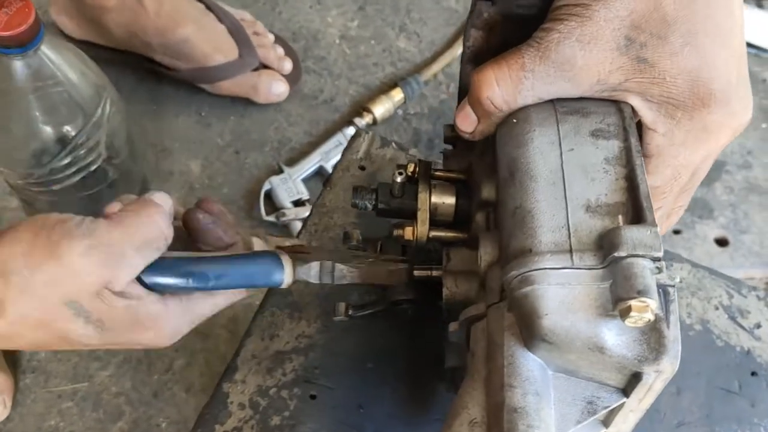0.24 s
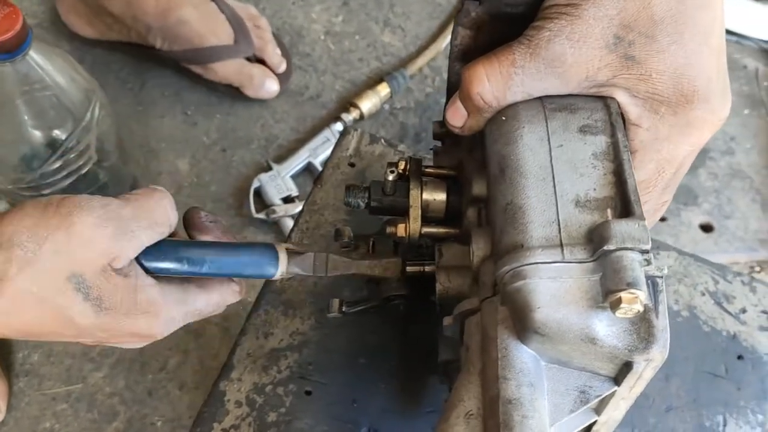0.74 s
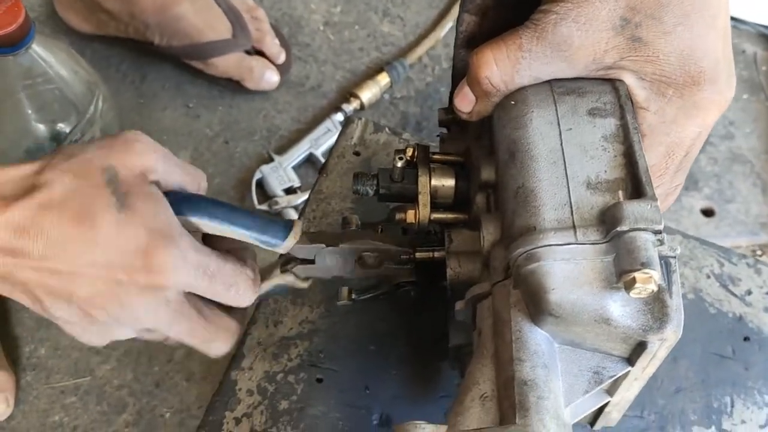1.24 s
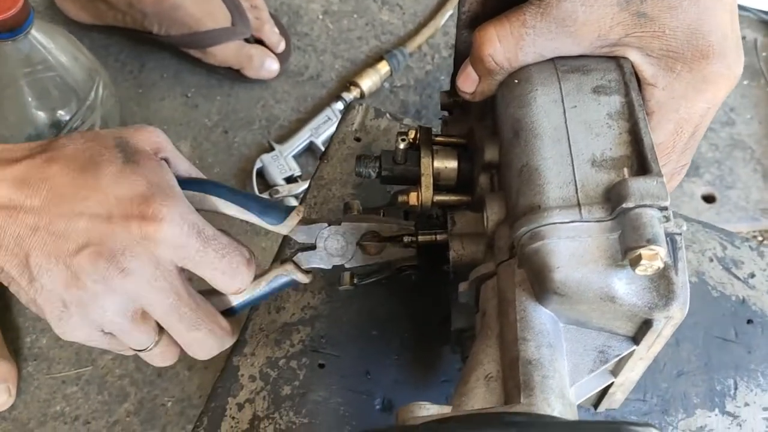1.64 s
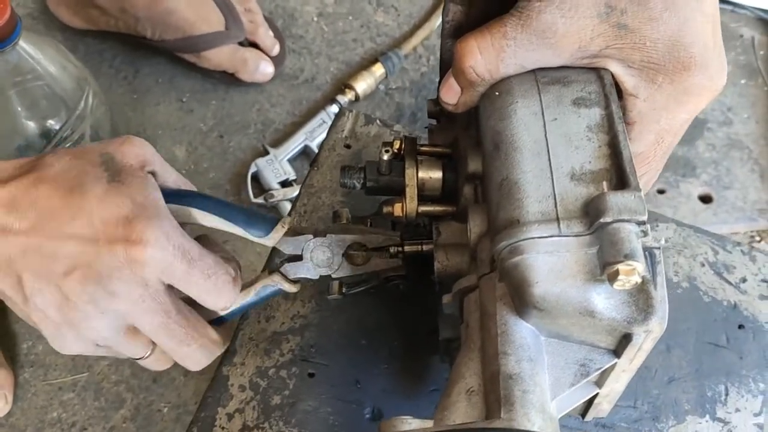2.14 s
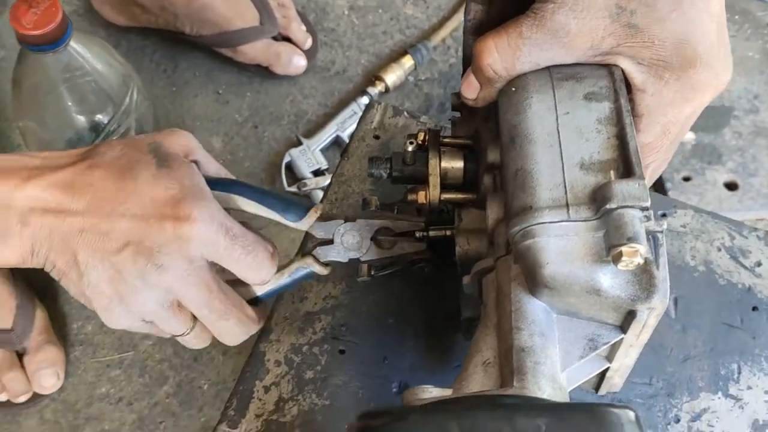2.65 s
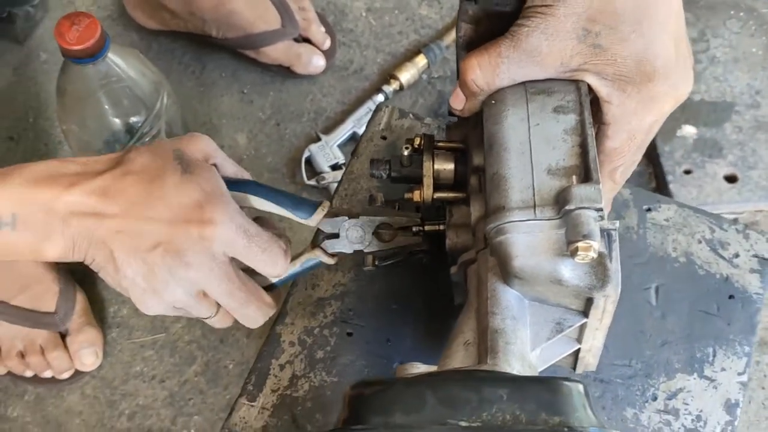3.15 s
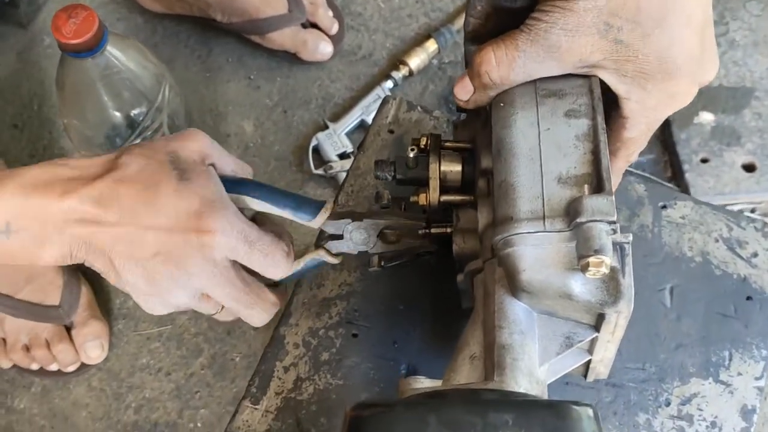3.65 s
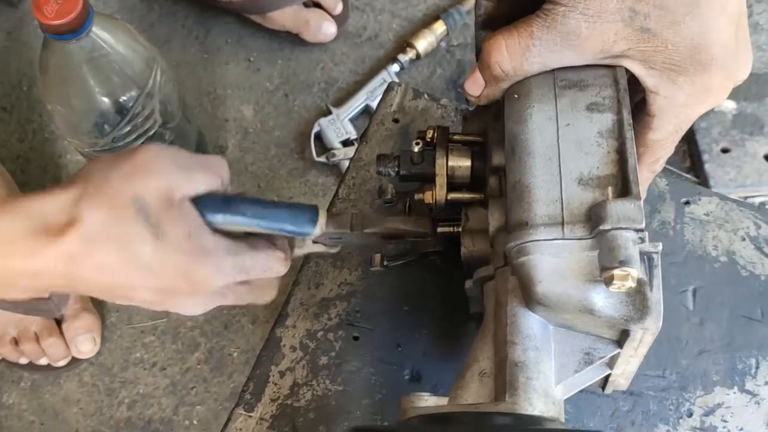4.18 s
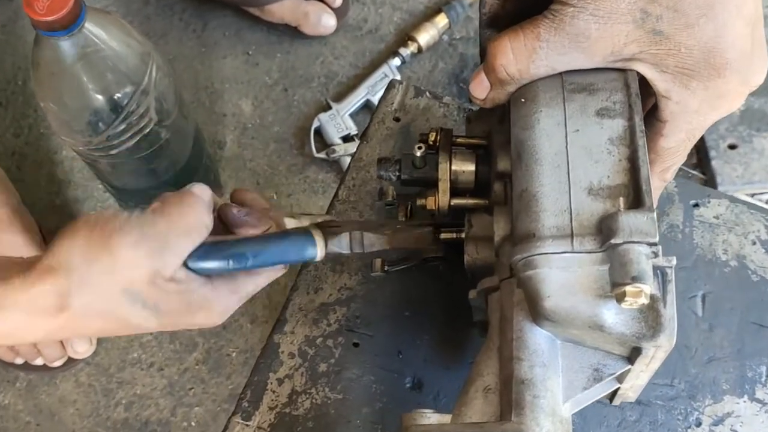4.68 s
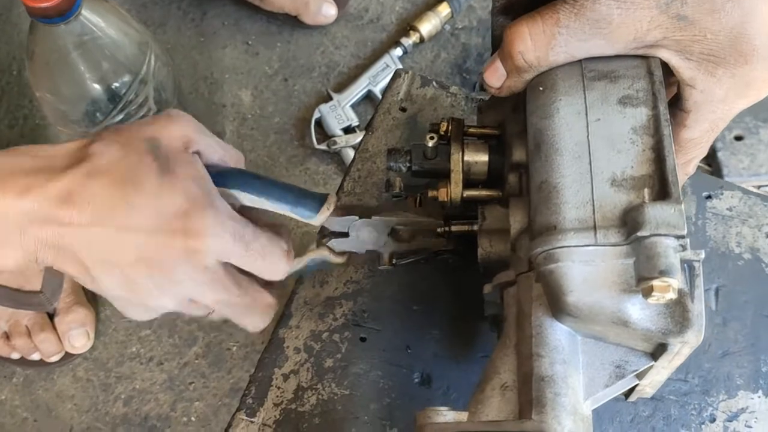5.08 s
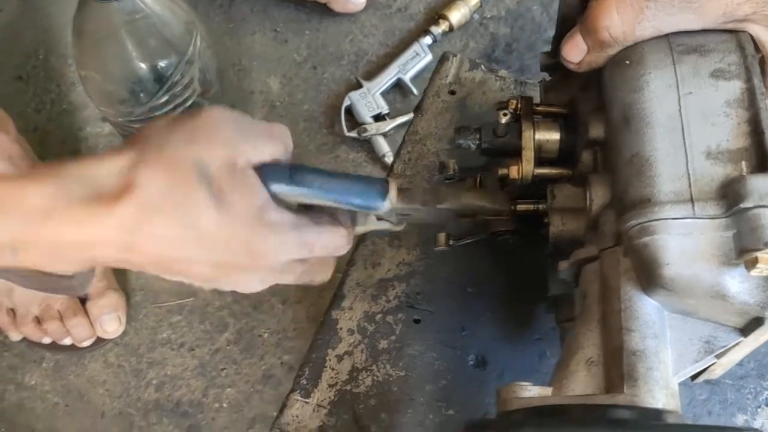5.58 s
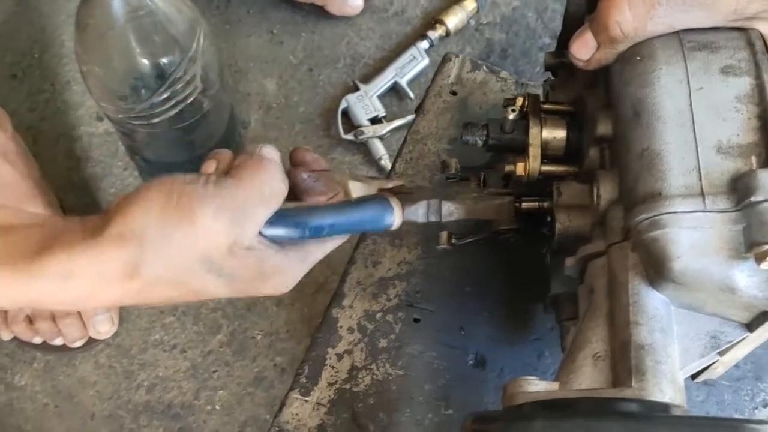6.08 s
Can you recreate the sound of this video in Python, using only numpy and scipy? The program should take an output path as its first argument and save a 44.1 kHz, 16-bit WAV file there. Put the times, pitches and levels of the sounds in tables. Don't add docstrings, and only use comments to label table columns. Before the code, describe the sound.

A steel valve is ground to and fro in abrasive paste, scraping and clicking about four times a second, distant engines droning behind.

```python
import sys
import numpy as np
from scipy import signal
from scipy.fft import rfft, irfft, next_fast_len
from scipy.io import wavfile
from scipy.ndimage import uniform_filter1d

SR = 44100
rng = np.random.default_rng(int(sys.argv[2]) if len(sys.argv) > 2 else 0)


def undo_db(level):
    steps = np.asarray(level, float) / 20
    return 10 ** steps


def dump(signal):
    limited = np.clip(np.atleast_2d(signal).T, -1, 1)
    pcm = np.round(limited * 32767).astype(np.int16)
    wavfile.write(sys.argv[1], SR, pcm)


N = 278756


def evened(x):
    return x / np.sqrt(np.mean(x ** 2) + 1e-20)


def read(points, hz):
    f, value = np.transpose(points)
    return np.interp(np.log(hz + 1), np.log(f + 1), value)


def colour(x, gain_db):
    log_gain = np.maximum(gain_db(abs(np.fft.fftfreq(8192, 1 / SR))), -100) * np.log(10) / 20
    taps = np.fft.ifft(np.exp(np.conj(signal.hilbert(log_gain)))).real[:4096]
    return signal.oaconvolve(x, taps)[:len(x)]


def ring(x, modes, wander=None):
    out = np.zeros(len(x))
    for k, (hz, width_hz, db) in enumerate(modes):
        drive = x if wander is None else x * np.roll(wander, k * N // len(modes))
        mode = signal.lfilter(*signal.iirpeak(hz, hz / width_hz, SR), drive)
        out += (-1) ** k * undo_db(db) * mode
    return out


def resonate(x, hz, width_hz):
    turn = np.exp(2j * np.pi * np.cumsum(hz) / SR)
    r = np.exp(-np.pi * width_hz / SR)
    return 2 * (turn * signal.lfilter([1 - r], [1, -r], x / turn)).real


def drift(rate_hz):
    return evened(signal.lfilter(*signal.butter(2, rate_hz, fs=SR), rng.standard_normal(N)))


def swells(rows, rest_db):
    t = np.arange(N) / SR
    bells = sum(undo_db(2 * db) * np.exp(-((t - s) / width_s) ** 2) for s, width_s, db in rows)
    return np.sqrt(undo_db(2 * rest_db) + bells)


def pair(x, other, same):
    size = next_fast_len(N)
    c = np.clip(read(same, np.fft.rfftfreq(size, 1 / SR)), -1, 1)
    mixed = c * rfft(x, size) + np.sqrt(1 - c ** 2) * rfft(other, size)
    return np.array([irfft(mixed, size)[:N], x])


def reflections(t60_s):
    t = np.arange(round(t60_s * SR)) / SR
    taps = rng.standard_normal(len(t)) * undo_db(-60 * t / t60_s)
    return taps / np.linalg.norm(taps)


# (time [s], speed [Hz])
IDLE_SPEED = [(1.5, 40.6), (1.8, 44.15), (2.1, 45.2), (2.55, 39.03), (3.3, 45.5), (3.8, 47), (4.8, 45.76),
              (6.32, 49.17)]
# (multiple of shaft speed, level [dB])
IDLE_ORDERS = [(2, -5.5), (3, -8), (4, -9)]
# (time [s], width [s], level [dB])
DRONE_SWELLS = [
    (0, 0.48, -52.5),
    (1.3, 0.81, -51),
    (3.5, 0.15, -42.5),
    (4.2, 0.19, -49),
    (5.57, 0.27, -40.5),
]
# (time [s], width [s], level [dB])
THROB_SWELLS = [
    (.7, .8, -51),
    (5.8, .25, -52),
]


def engines():
    t = np.arange(N) / SR
    full_hz, db_per_hz = 46.1, 0.5
    shaft_hz = np.interp(t, *np.transpose(IDLE_SPEED))
    turns = np.cumsum(shaft_hz * (1 + 0.0023 * drift(3.4))) / SR
    idle = sum(undo_db(db + 1.9 * drift(5.9)) * np.sin(2 * np.pi * k * turns) for k, db in IDLE_ORDERS)
    idle *= (t > IDLE_SPEED[0][0]) * undo_db(-47 + db_per_hz * np.minimum(shaft_hz - full_hz, 0))

    drone_hz = 104.3 * (1 + 0.011 * drift(3.9))
    angle = 2 * np.pi * np.cumsum(drone_hz) / SR
    drone = swells(DRONE_SWELLS, -59) * np.sin(angle)
    drone += swells(THROB_SWELLS, -60) * np.sin(angle / 2)
    return np.sqrt(2) * (idle + drone * undo_db(2.0 * drift(7.2)))


# (frequency [Hz], density [dB per Hz])
RUMBLE_SPECTRUM = [(12, -34), (20, -23), (43, -1), (103, -2), (290, -8.5), (454, -15), (541, -12),
                   (792, -17), (900, -17), (1170, -30), (1980, -120)]
# (frequency [Hz], density [dB per Hz])
HISS_SPECTRUM = [(240, -32), (400, -1.5), (545, -26), (598, 0), (710, -19), (816, -17.5), (1080, -5.5),
                 (1850, -10.5), (3500, -5), (5570, -12), (6110, -19.5), (6600, -14.5), (9880, -30),
                 (16200, -32)]
# (time [s], width [s], level [dB])
PASSES = [
    (.7, 0.8, -46),
    (5.65, 0.48, -44.5),
]
# (frequency [Hz], likeness [-1..1])
SAME_FAR = [(60, 0.97), (180, 0.95), (550, 0.74), (1650, -0.47), (4970, 0.27), (15000, -0.3)]


def shop():
    sides = []
    for a, b in rng.standard_normal((2, 2, N)):
        rumble = evened(colour(a, lambda hz: read(RUMBLE_SPECTRUM, hz))) * swells(PASSES, -45.5)
        hiss = evened(colour(b, lambda hz: read(HISS_SPECTRUM, hz))) * undo_db(-47)
        hiss *= undo_db(0.9 * drift(15))
        sides.append(rumble + hiss)
    return pair(*sides, SAME_FAR) + engines()


# (time [s], width [s], level [dB])
RETURNS = [
    (4.03, 0.033, -57),
    (4.46, 0.04, -61),
    (4.93, 0.046, -51.5),
    (5.41, 0.028, -52),
    (5.91, 0.057, -55),
]
# (centre [Hz], width [Hz], level [dB])
RETURN_RINGS = [(9500, 680, 1), (12800, 1900, -7), (15200, 1500, -10)]


def drag_back():
    hiss = np.array([ring(x, RETURN_RINGS) for x in rng.standard_normal((2, N))])
    return swells(RETURNS, -61) * evened(hiss)


# (frequency [Hz], density [dB per Hz])
STEEL_SPECTRUM = [(680, -24), (1150, -4.5), (1500, -8), (1890, -2.5), (2700, -6.5), (2950, -4.5),
                  (3370, -7), (4490, -0.5), (4910, -1), (6330, -10), (7230, -17.5), (9220, -15.5),
                  (11500, -19.5), (12900, -18.5), (16200, -35)]
# (centre [Hz], width [Hz], level [dB])
STEEL_RINGS = [(3003, 42, 1.5), (4660, 27, -26), (5106, 90, -2.5), (5940, 43, 5), (2228, 50, -6),
               (1905, 170, -16), (6300, 53, 3.5)]


def steel(x):
    return colour(x + ring(x, STEEL_RINGS), lambda hz: read(STEEL_SPECTRUM, hz))


# (centre [Hz], width [Hz], level [dB])
HOUSING_MODES = [(236, 46.5, -1.5), (296.3, 4.4, 4.5), (355, 37, -3.5), (394, 14, -5), (502, 85, 3.5),
                 (607, 71, 1), (612, 34, -4), (714, 58, -0.5), (901, 210, -1), (1104, 38, -2),
                 (1262, 71, -5.5), (1370, 96, -3)]


def housing(x, wander=None):
    return ring(x, HOUSING_MODES, wander)


# (time [s], width [s], level [dB])
CHATTER = [(.24, 0.018, -34), (.285, 0.027, -30), (.465, 0.022, -41), (.785, 0.023, -35),
           (1.39, 0.02, -30.5), (1.6, 0.01, -34), (1.66, 0.032, -31.5), (1.845, .02, -33),
           (1.895, .01, -34), (2.115, 0.0089, -40), (2.295, 0.013, -26), (2.475, 0.0087, -39),
           (2.855, 0.023, -30.5), (3.045, 0.014, -31), (3.11, 0.011, -28.5), (3.15, 0.0051, -32),
           (3.19, .01, -52), (3.285, .02, -28.5), (3.48, 0.02, -53), (3.81, 0.029, -33),
           (4.265, 0.013, -25), (4.35, 0.0054, -30.5), (4.73, 0.037, -35), (5.2, .015, -28),
           (5.36, .01, -43), (5.7, 0.038, -38), (5.82, 0.02, -46.5), (6.11, 0.016, -29),
           (6.295, 0.023, -37.5)]


def chatter():
    hz, width_hz = 537 + 26.7 * drift(6.8), 59
    once = resonate(rng.standard_normal(N), hz, width_hz)
    return swells(CHATTER, -90) * evened(resonate(once, hz, 2 * width_hz))


# (time [s], peak level [dB], relative housing knock [dB])
JAWS = [(0.0608, -23, -3), (0.16, -24, -9), (0.395, -34, -14.5), (0.419, -29, -6), (0.6045, -24, -12),
        (0.665, -21, -16), (0.922, -31, -8), (0.972, -15.5, -2), (1.1454, -29, -2.5), (1.276, -26, -12),
        (1.302, -19, -10), (1.5085, -22, -5), (1.7855, -27, -4.5), (1.997, -33, -1), (2.2303, -39, -4),
        (2.4637, -29, 11), (2.7573, -18.5, -20), (3.0045, -17, -11), (3.255, -34, -16), (3.2635, -16, -8),
        (3.4535, -21.5, -12), (3.744, -16, 2), (4.194, -10.5, -0.5), (4.657, -19, 3), (4.819, -26, -10),
        (5.1098, -12.5, -5.5), (5.334, -25.5, -9), (5.5797, -18, -12), (5.8102, -35, -11.5),
        (6.046, -20, 0)]
# (time [s], peak level [dB], relative housing knock [dB])
CRACKS = [(0.0388, -28, -14), (1.8144, -10, -10), (2.0183, -25, -15), (2.807, -14.5, 1), (3.8721, -14, -12),
          (4.2536, -11, -5), (4.3146, -4.5, -27), (4.338, -15.5, -13), (5.6057, -26, -15),
          (5.681, -13, -15), (6.0866, -16, -19), (6.2714, -18.5, -2)]


def clicks():
    t60_s, attack_s = 0.018, 0.00023
    sharp, knock = np.zeros((2, N + 4000))
    t = np.arange(4000) / SR
    events = JAWS + CRACKS
    for (s, db, knock_db), rattle in zip(events, rng.standard_normal((len(events), 4000))):
        burst = rattle * undo_db(db - 60 * t / t60_s) * np.minimum(t / attack_s, 1)
        burst /= np.sqrt(np.mean(rattle[5:70] ** 2))
        at = round(s * SR)
        sharp[at:at + 4000] += burst
        knock[at:at + 4000] += burst * undo_db(knock_db)
    sharp += undo_db(6) * resonate(sharp, np.full(len(sharp), 4900.), 870)
    edge = signal.butter(2, 7500, "high", fs=SR, output="sos")
    sharp += signal.sosfilt(edge, sharp)
    unit = rng.standard_normal(20000)
    bright = undo_db(-11) * steel(sharp) / np.std(steel(unit))
    low = undo_db(-10.5) * housing(knock) / np.std(housing(unit))
    return (bright + low)[:N]


# (start [s], climb [s], hold [s], grit level [dB], housing rumble relative to grit [dB])
BITTEN = [(.161, 0.12, 0.03, -25.5, -4.5), (.604, 0.001, 0.0023, -39.5, -5.5), (.666, 0.018, 0.02, -32, -5),
          (.75, 0.034, 0.026, -33.5, -1.5), (1.3, 0.088, 0.052, -26, -2.5), (1.51, .12, .015, -25.5, -2),
          (1.65, 0.0028, 0.044, -34, -7), (2.09, .002, 0.04, -35.5, -3.5), (2.758, .002, 0.07, -38.5, -6.5),
          (2.805, 0.048, 0.06, -26, -3), (3.263, 0.022, 0.069, -27, -2.5), (3.454, .002, 0.014, -43.5, 5.5),
          (3.745, .01, .12, -28, -4), (4.194, 0.049, 0.077, -26.5, -5), (4.658, 0.055, 0.067, -24.5, -5),
          (5.109, .002, 0.048, -36, -5.5), (5.157, 0.069, 0.03, -23.5, -3.5), (5.58, 0.1, 0.05, -24.5, -3),
          (6.049, .055, 0.055, -24.5, -2.5)]
# (start [s], climb [s], hold [s], grit level [dB], housing rumble relative to grit [dB])
EASED = [(0.0, 0.012, 0.12, -50.5, -6.5), (.4, 0.051, .06, -28.5, -2.5), (1.24, 0.021, 0.051, -49, -8.5),
         (1.785, 0.04, .092, -26.5, -2), (1.99, 0.034, 0.059, -28, -1), (2.23, 0.062, 0.088, -26.5, -3),
         (2.42, .03, 0.023, -47, 2.5), (2.96, 0.042, 0.023, -36, 1), (3.045, 0.039, 0.051, -34.5, -2),
         (5.29, 0.047, 0.099, -49, -2.5), (5.76, 0.036, 0.068, -45, -9), (6.24, 0.033, 0.069, -31.5, -2)]


def strokes():
    climb_db_per_s, ease_db, bite_s = 102, 17.5, 0.0017
    release_db_per_s, brake_db_per_s2 = 200, 4499.5
    seat_db, seat_s = -3, 0.013
    t = np.arange(N) / SR
    grit_power, housing_power = np.zeros((2, N))
    for rows, eased in ((BITTEN, False), (EASED, True)):
        for start, climb, hold, db, housing_db in rows:
            climb = max(climb, 0.001)
            u = np.maximum(t - start, 0)
            past = np.maximum(u - climb - hold, 0)
            depth_db = ease_db if eased else climb_db_per_s * climb
            shape_db = -depth_db * np.maximum(1 - u / climb, 0)
            shape_db -= (release_db_per_s + brake_db_per_s2 * past) * past
            power = np.minimum(u / bite_s, 1) ** 2 * undo_db(2 * np.maximum(db + shape_db, -200))
            grit_power += power
            housing_power += power * undo_db(2 * (housing_db + seat_db * np.exp(-u / seat_s)))
    return np.sqrt(grit_power), np.sqrt(housing_power)


def grit():
    grains_per_s, spread_db, clump_db = 7000, 2.6, 1.5
    t = np.arange(N) / SR
    grit_gain, housing_gain = strokes()
    crest_hz = 5330 - 117 * t + 130 * drift(2.5)
    size_db = spread_db * np.minimum(rng.exponential(1, N), 4.2) + clump_db * drift(166)
    size = (rng.random(N) < grains_per_s / SR) * undo_db(size_db)
    top = signal.butter(4, 7000, "high", fs=SR, output="sos")
    fizz_gain = undo_db(-1 + 0.2 * t)
    wander = undo_db(2.5 * drift(12))
    out = []
    for ticks in evened(size * rng.choice([-1., 1.], (2, N))):
        bright = evened(steel(ticks + undo_db(-8.5) * resonate(ticks, crest_hz, 530)))
        bright += signal.sosfilt(top, bright) * (fizz_gain - 1)
        low = housing(housing_gain * ticks, wander) / np.std(housing(ticks))
        out.append(grit_gain * bright + low)
    return np.array(out)


# (frequency [Hz], likeness [0..1])
SAME_NEAR = [(60, .99), (500, .97), (900, .85), (1500, .35), (2500, .12), (15000, .05)]
# (frequency [Hz], likeness [0..1])
SAME_TAIL = [(100, 1), (800, 0.95), (1600, 0.57), (15000, 0.47)]


def scene():
    facing, turned = grit()
    valve = facing + clicks() + chatter()
    scattered = signal.oaconvolve(valve, reflections(0.01))[:N]
    near = pair(valve, undo_db(-7) * scattered + undo_db(-1) * turned, SAME_NEAR)
    tail = [signal.oaconvolve(valve, reflections(0.086))[:N] for _ in near]
    return near + undo_db(-7) * pair(*tail, SAME_TAIL) + drag_back() + shop()


# (frequency [Hz], share [0..1])
DROPPED = [(3000, 0), (4600, .05), (5800, .15), (6600, .2), (7400, .34), (8200, .4), (9600, .22),
           (12000, .3), (14000, .34), (15200, .15)]


def patchy_treble(x):
    patchy_db, edge_hz, attack_edge_hz, bins = 4.5, 15850, 16100, 10
    frame = dict(window=np.sqrt(signal.get_window("hann", 2048)), nperseg=2048, noverlap=1024)
    hz, _, z = signal.stft(x, SR, **frame)
    chance, level = rng.standard_normal((2, z.shape[2], len(hz) // bins + 1))
    chance = evened(uniform_filter1d(chance, size=4, axis=0))
    rank = chance.ravel().argsort().argsort().reshape(chance.shape) / chance.size
    rank, level = (np.repeat(v, bins, axis=1)[:, :len(hz)].T for v in (rank, level))
    share = np.clip(read(DROPPED, hz), 0, 1)[:, None]
    gain = (rank >= share) * undo_db(patchy_db * np.minimum(level, 1) * np.minimum(share * 6, 1))
    gain = gain * (hz < edge_hz)[:, None]
    power_db = 10 * np.log10((abs(z[:, 150:]) ** 2).sum((0, 1)) + 1e-20)
    attack = np.diff(power_db, prepend=0) > 5
    gain[:, attack | np.roll(attack, -1)] = (hz < attack_edge_hz)[:, None]
    return signal.istft(z * gain, SR, **frame)[1][:, :N]


def top_cut(x):
    return signal.sosfilt(signal.butter(12, 16370, fs=SR, output="sos"), x)


# (frequency [Hz], left minus right [dB])
PORTS = [(0, 1), (600, -1), (1200, -3), (1900, -6), (2800, -13.5), (4200, -17), (5500, -14), (6500, -1.5),
         (9000, 2.5), (12000, -6), (15000, 1.5)]


def record(dry):
    left = colour(dry[0], lambda hz: 3 - 10 * np.log10(1 + undo_db(-2 * read(PORTS, hz))) + 1.24)
    right = colour(dry[1], lambda hz: 3 - 10 * np.log10(1 + undo_db(2 * read(PORTS, hz))) + 1.23)
    mix = patchy_treble(np.array([left, right])) + 0.0046
    return top_cut(mix)


dry = scene()
out = record(dry)
dump(out)
```